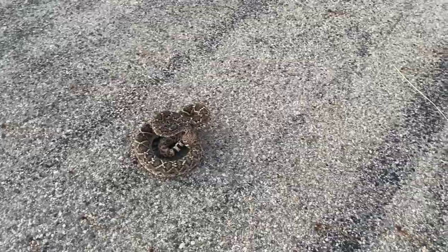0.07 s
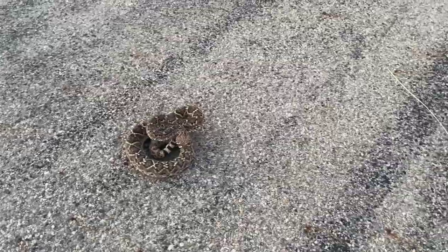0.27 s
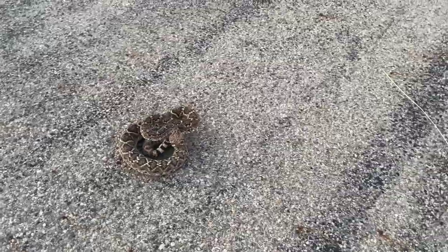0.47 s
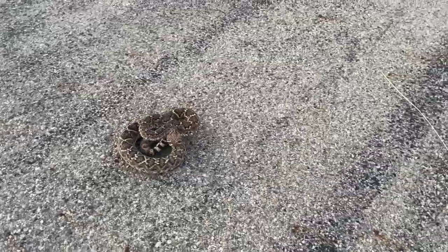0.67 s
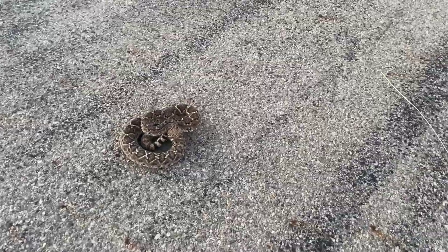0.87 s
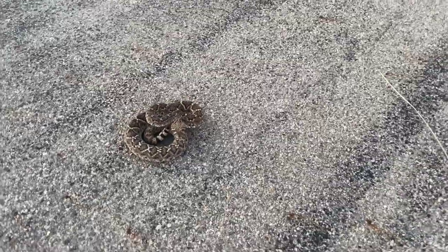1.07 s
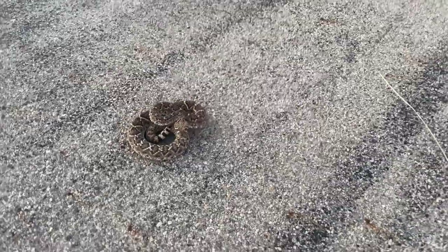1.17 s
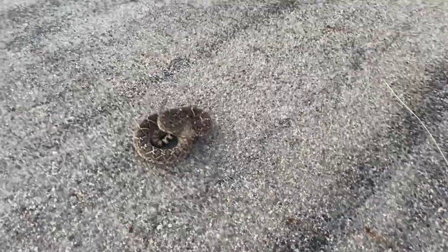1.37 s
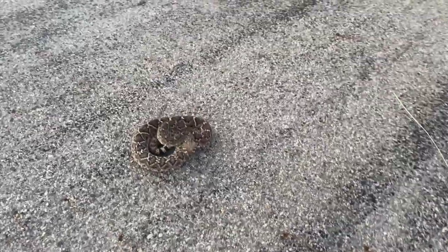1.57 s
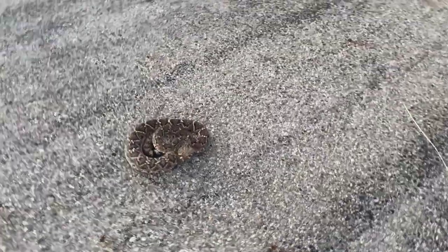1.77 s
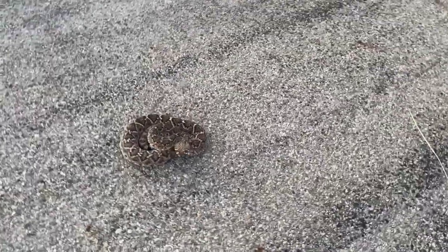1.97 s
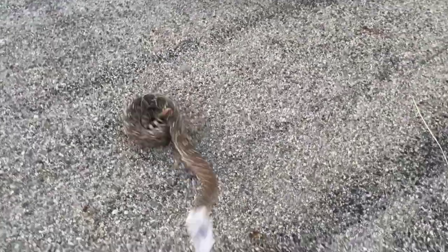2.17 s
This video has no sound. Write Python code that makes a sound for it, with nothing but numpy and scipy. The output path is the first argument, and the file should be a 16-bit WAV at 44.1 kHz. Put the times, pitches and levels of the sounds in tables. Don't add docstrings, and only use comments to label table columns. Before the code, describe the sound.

Rattlesnake rattle stutters up, then buzzes fast and dry, briefly faltering near the end

```python
import sys
import numpy as np
from scipy import signal
from scipy.fft import rfft, irfft, next_fast_len
from scipy.io import wavfile

SR = 44100
rng = np.random.default_rng(int(sys.argv[2]) if len(sys.argv) > 2 else 0)


def materialize(psi):
    bounded = np.clip(np.atleast_2d(psi).T, -1, 1)
    quanta = np.round(bounded * 32767).astype(np.int16)
    wavfile.write(sys.argv[1], SR, quanta)


def gain_from_decibels(decibels):
    exponent = np.asarray(decibels, float) / 20
    return 10 ** exponent


N = 97461
TIME = np.arange(N) / SR


def rms_one(x):
    return x / np.sqrt(np.mean(x ** 2) + 1e-20)


def in_time(rows):
    s, *columns = np.transpose(rows)
    return [np.interp(TIME, s, column) for column in columns]


def at_hz(points, hz):
    point_hz, value = np.array(points).T[:2]
    return np.interp(np.log(hz), np.log(point_hz), value)


def drift(rate_hz):
    every = 40
    r = np.exp(-2 * np.pi * rate_hz * every / SR)
    noise = rng.standard_normal(N // every + 2002)
    slow = signal.lfilter([1], [1, -2 * r, r * r], noise)[2000:]
    return np.interp(np.arange(N) / every, np.arange(len(slow)), rms_one(slow))


def resonate(x, hz, width_hz):
    r = np.exp(-np.pi * width_hz / SR)
    poles = [1, -2 * r * np.cos(2 * np.pi * hz / SR), r * r]
    return signal.lfilter([(1 - r * r) / 2, 0, (r * r - 1) / 2], poles, x + 1e-18)


def resonate_twice(x, hz, width_hz):
    return resonate(resonate(x, hz, width_hz), hz, width_hz)


def hiss():
    return gain_from_decibels(-66) * np.diff(rng.standard_normal((2, N + 1)))


# (frequency [Hz], density [dB per Hz])
HUM_SPECTRUM = [(15, -39), (25, -13), (65, 0.5), (135, -4.5), (257, -17.5), (441, -11.5), (901, -21),
                (1370, -33.5), (1600, -22.5), (2080, -73.5), (3520, -120)]
# (frequency [Hz], correlation [-1 to 1])
HUM_COHERENCE = [(60, .88), (160, .9), (300, .82), (600, .62), (1500, .5)]
# (time [s], level [dB], length [s])
RUMBLE_SWELLS = [
    (0.167, 3, 0.1),
    (.3, 3, .1),
    (.42, 2.5, .1),
    (.97, 5, .15),
    (1.25, -2.5, .2),
    (2.1, 2.5, .25),
]


def hum():
    patchy_db, fade_db_per_s, fade_below_hz = 1, 2.5, 120
    swell_db = sum(db * np.exp(-(2 * (TIME - s) / length) ** 2) for s, db, length in RUMBLE_SWELLS)
    rumble_db = swell_db - fade_db_per_s * (TIME - N / 2 / SR)
    edges = 22 * 2 ** np.arange(0, 7, .5)
    white = rng.standard_normal((2, 2, N + 8000))
    out = 0
    for k, (low, high) in enumerate(zip(edges, edges[1:])):
        band = signal.butter(2, [low, high], "band", fs=SR, output="sos")
        mid, side = signal.sosfilt(band, white[k % 2])[:, -N:]
        hz = np.sqrt(low * high)
        alike = np.clip(at_hz(HUM_COHERENCE, hz), -1, 1)
        pair = np.sqrt(1 + alike) * mid + np.sqrt(1 - alike) * side * [[1], [-1]]
        level_db = at_hz(HUM_SPECTRUM, hz) + patchy_db * drift(4.2) + (hz < fade_below_hz) * rumble_db
        out = out + gain_from_decibels(level_db) * pair
    return gain_from_decibels(-53.5) * rms_one(out)


def slide():
    middle_s, length_s, grains_per_s = 1.87, 0.7, 1500
    grains = rng.standard_normal((2, N)) * (rng.random(N) < grains_per_s / SR)
    swell = np.exp(-(2 * (TIME - middle_s) / length_s) ** 4)
    return gain_from_decibels(-56.5) * swell * rms_one(resonate_twice(grains, hz=1170, width_hz=1050))


# (time [s], peak level [dB], frequency [Hz])
GRIT_TICKS = [
    (.713, -43, 850),
    (2.07, -47, 1310),
    (2.079, -44, 860),
    (2.101, -40, 830),
    (2.157, -47, 290),
    (2.178, -44, 280),
    (2.196, -46, 666),
]


def grit():
    cycles, out = 12, 0
    for s, db, hz in GRIT_TICKS:
        since = TIME - s
        decay = gain_from_decibels(-60 * hz * np.abs(since) / cycles)
        out = out + gain_from_decibels(db) * (since > 0) * np.sin(2 * np.pi * hz * since) * decay
    return out


# (time [s], swings per second [Hz])
SWING_RATE = [(0, 61.01), (.15, 64.85), (.36, 73.82), (.55, 74.07), (.86, 71.11), (1.1, 70.68),
              (1.3, 70.14), (1.55, 72.33), (1.8, 76.23), (2.0, 77.01), (2.21, 73.51)]
# (time [s], level [dB], excess of the forward stroke over the return [dB])
TAIL_EFFORT = [(0, -38, -2.4), (.17, -38.5, -0.8), (.21, -33, 1), (.36, -27.5, 1), (.55, -27, -0.5),
               (.86, -26.5, -0.54), (1.1, -27.5, 0.4), (1.3, -27, 0.1), (1.4, -27.5, 0.5), (1.49, -30, 1.5),
               (1.6, -28, 0.56), (1.78, -27.5, 1.5), (2.0, -28.5, 2), (2.035, -42, 4.5), (2.088, -34, 2),
               (2.1, -31.5, -2), (2.15, -27.5, 1.1), (2.21, -32.5, -2)]
# (time [s], boost [dB], length [s])
TAIL_JERKS = [(.014, 5.5, .02), (0.049, 4, 0.015), (.06, 13, 0.0067), (0.065, 9, 0.0055), (0.082, 3, 0.023),
              (0.107, 11, 0.0068), (0.114, 7.5, 0.0087), (0.143, 5, 0.015), (0.154, 8.5, 0.0091),
              (0.159, 5.5, 0.0063), (.187, 3.5, 0.013), (.2, 8, 0.003), (0.232, 4, 0.0093),
              (0.25, 4, 0.0044), (0.269, 4, 0.0049), (0.306, -1, 0.0087), (0.333, 2, 0.016),
              (1.995, 0.5, 0.0038), (2.028, 12, 0.0051), (2.034, 1, .005), (2.082, -6.5, 0.0071),
              (2.101, 2.5, 0.006), (2.113, 2, 0.0072), (2.13, -1, 0.005), (2.138, 2, 0.0049),
              (2.147, 3, 0.0032), (2.054, -2, .006), (2.065, -2, .004), (0.033, -1.5, 0.013),
              (0.133, -2, .01), (0.166, -2, 0.005)]


def swing_tail():
    slam_decay_s, lopsided_share, slam_spread_db = .002, 1.3, 1.0
    turns = .32 + np.cumsum(in_time(SWING_RATE)[0]) / SR
    effort_db, lopsided_db = in_time(TAIL_EFFORT)
    jerk_db = sum(db * np.exp(-(2 * (TIME - s) / length) ** 4) for s, db, length in TAIL_JERKS)
    level_db = effort_db + jerk_db + .6 * drift(17.6)
    stroke_db = .5 * np.cos(4 * np.pi * turns) + lopsided_db * np.cos(2 * np.pi * turns - .4)
    ends = np.floor(2 * turns + .07).astype(int)
    slam_db = lopsided_share * lopsided_db * (-1.) ** ends
    slam_db = slam_db + slam_spread_db * rng.standard_normal(400)[ends]
    impulses = np.diff(ends, prepend=ends[0]) * gain_from_decibels(slam_db)
    slams = signal.lfilter([1], [1, -np.exp(-1 / (slam_decay_s * SR))], impulses)
    return level_db, stroke_db, slams


def rasp(level_db):
    noise = rng.standard_normal((2, N))
    return gain_from_decibels(level_db - 32.5) * rms_one(resonate_twice(noise, hz=1157, width_hz=1800))


# (time [s], turned away [0-1], raised [0-1])
RATTLE_POSE = [
    (0, 0.4, 0.34),
    (.3, 0.02, 0.24),
    (.9, 0.62, 0.2),
    (1.0, 0.15, 0.95),
    (1.28, 0.38, 1),
    (1.38, 0.97, 0.64),
    (1.6, 0.81, 0.37),
    (1.85, 0.59, 0.27),
    (2.21, 0.5, 0.9),
]


def posed_gain(db, turned_db, raised_db):
    turned, raised = in_time(RATTLE_POSE)
    return gain_from_decibels(db + turned_db * turned + raised_db * raised)


# (frequency [Hz], level [dB], width [Hz], change when turned [dB], change when raised [dB])
SHELL_MODES = [(1822, -20.5, 83, -33.5, 23.5), (2203, -14.5, 39, 3, -0.5), (2583, -3.5, 123, -9, -16),
               (3127, -6, 350, 4.5, -3.5), (3495, 1.5, 210, -6.5, 1), (3680, -5, 180, 13, -7.5),
               (4133, -4.5, 85, -0.4, 4), (4440, -8, 640, 1.5, -2), (5200, -4.5, 450, 0.5, 4.5),
               (5910, -19.5, 360, -2, 15.5), (7280, -4.5, 750, -8.5, -6), (9980, -14.5, 1500, 1.5, -4.5),
               (11060, -12, 2260, -4, 0.5), (14770, -11, 2900, -0.5, 0)]


def rattle(level_db, stroke_db, slams):
    knocks_per_s, spread_db = 20000, 3.4
    always_struck_hz, slam_cut_hz = 1191, 6500
    born = rng.random(N) < knocks_per_s * gain_from_decibels(stroke_db) / SR
    knocks = born * gain_from_decibels(spread_db * np.minimum(rng.exponential(1, N), 3) + stroke_db)
    out = 0
    for hz, db, width, turned_db, raised_db in SHELL_MODES:
        share = np.clip(width / always_struck_hz, .3, 1)
        struck = knocks * (rng.random(N) < share) / np.sqrt(share)
        blows = (struck + slams * (hz < slam_cut_hz)) * rng.standard_normal(N)
        gain = posed_gain(db, turned_db, raised_db) * gain_from_decibels(drift(3.7))
        out = out + resonate(blows * gain, hz, width)
    out = signal.sosfilt(signal.butter(5, 2010, "high", fs=SR, output="sos"), out)
    return gain_from_decibels(level_db) * rms_one(out)


# (time [s], peak level [dB])
HARDEST_KNOCKS = [(0.255, -28.7), (0.27, -24), (0.3117, -28.2), (0.3845, -28.5), (0.4248, -15.5),
                  (0.4346, -15.5), (0.465, -19), (0.4885, -18), (0.5046, -24.9), (0.5313, -38),
                  (0.5592, -19), (0.5703, -18), (0.6271, -20.5), (0.64, -13.5), (0.7395, -23.4),
                  (0.7788, -17), (0.8049, -22.4), (0.8833, -19), (0.947, -21), (0.9736, -24.4),
                  (0.9968, -28), (1.0068, -27), (1.0722, -24.5), (1.1158, -30), (1.1301, -20),
                  (1.1417, -17), (1.1722, -29), (1.2009, -27), (1.215, -17), (1.2567, -19.5), (1.2848, -30),
                  (1.3123, -22), (1.3701, -19), (1.385, -18), (1.398, -22), (1.4436, -17.5),
                  (1.4614, -25.3), (1.5368, -18), (1.5522, -20), (1.5633, -18.5), (1.5805, -30),
                  (1.5934, -15.5), (1.6486, -20), (1.703, -14.5), (1.7161, -16.5), (1.7284, -20),
                  (1.7417, -26), (1.8065, -24.7), (1.8241, -19), (1.8339, -28), (1.8993, -25.9),
                  (1.9113, -17), (1.9524, -39), (1.9654, -36), (1.979, -17), (1.9928, -26.0), (2.1471, -28),
                  (2.1569, -33)]


def hard_knocks():
    low_hz, high_hz, contact_s, mix_db = 2400, 7500, .0009, 2.0
    s, knock_db = np.transpose(HARDEST_KNOCKS)
    length = int(2 * contact_s * SR)
    mixes = rng.standard_normal((len(SHELL_MODES), len(s)))
    out = 0
    for mix, (hz, db, width, turned_db, raised_db) in zip(mixes, SHELL_MODES):
        if low_hz < hz < high_hz:
            clicks = np.zeros(N)
            clicks[(s * SR).astype(int)] = gain_from_decibels(knock_db + mix_db * mix)
            burst = np.hanning(length) * np.sin(2 * np.pi * hz * np.arange(length) / SR)
            blows = signal.lfilter(burst, 1, clicks) * posed_gain(db, turned_db, raised_db)
            out = out + resonate(blows, hz, width)
    return out


def swung_round():
    middle_s, over_s = 1.27, .082
    return np.clip((TIME - middle_s) / over_s + .5, 0, 1)


def snake():
    level_db, stroke_db, slams = swing_tail()
    scatter_band = signal.butter(2, 3500, fs=SR, output="sos")
    scattered = signal.sosfilt(scatter_band, rattle(level_db, stroke_db, slams))
    near = gain_from_decibels(-1.5) * rattle(level_db, stroke_db, slams) + hard_knocks()
    near = near - .99 * (1 - swung_round()) * resonate(near, hz=3790, width_hz=67)
    both = near + gain_from_decibels(-6) * scattered * [[1], [-1]] + rasp(level_db)
    return both - .7 * resonate(both, hz=2430, width_hz=130)


def scene():
    return hiss() + hum() + slide() + grit() + snake()


# (frequency [Hz], phase [rad])
PORT_PHASE = [(0, 0), (700, -1), (1900, -.3), (2400, -3.1), (2900, -6.3), (3300, -7.3), (3800, -6.9),
              (6500, -12.5), (8270, -11.1)]
# (frequency [Hz], before [dB], after the rattle swings round [dB])
PORT_LEVELS = [(60, -2, -1), (350, 6.5, 5), (1750, -2, -1.5), (2580, 6.5, 8), (3440, 6.5, 2), (3670, -4, 3),
               (4040, 6.5, 1), (4800, -.5, -0.5)]


def two_ports(dry):
    gap_s, in_step_hz = 1 / 4300, 11125
    size = next_fast_len(N + 4096)
    hz = np.arange(size // 2 + 1) * SR / size
    knee_hz, lead = np.transpose(PORT_PHASE)
    delay = 2 * np.pi * (gap_s * (hz - in_step_hz) - 1)
    half = 1j * np.where(hz < knee_hz[-1], np.interp(hz, knee_hz, lead), delay) / 2
    ports = 0
    for column, share in ((1, 1 - swung_round()), (2, swung_round())):
        tilt = gain_from_decibels(at_hz(np.array(PORT_LEVELS)[:, [0, column]], hz + 1) / 2)
        response = [tilt * np.exp(-half), np.exp(half) / tilt]
        ports = ports + share * irfft(rfft(dry, size) * response, size)[:, :N]
    return ports


def band_limit(x):
    return signal.sosfilt(signal.butter(12, 16970, fs=SR, output="sos"), x)


def record(dry):
    return band_limit(two_ports(dry))


dry = scene()
out = record(dry)
materialize(out)
```